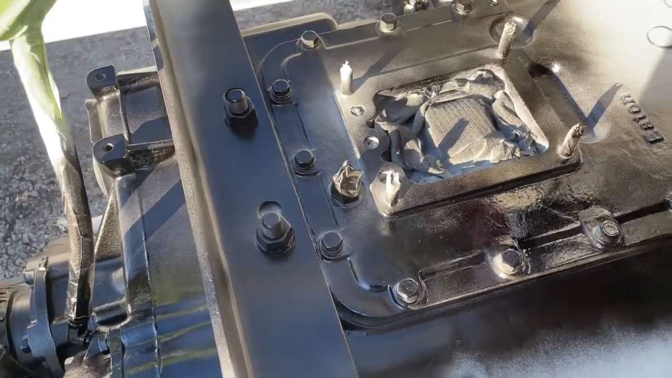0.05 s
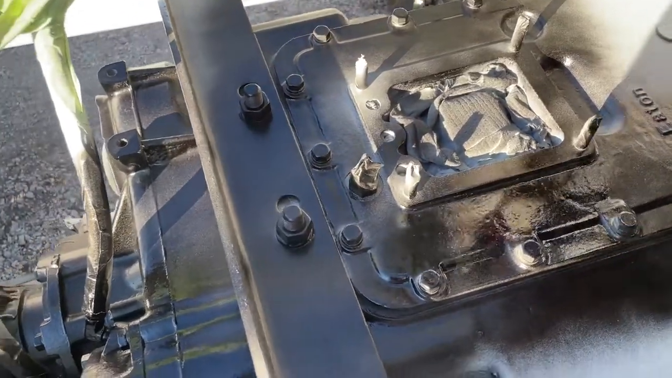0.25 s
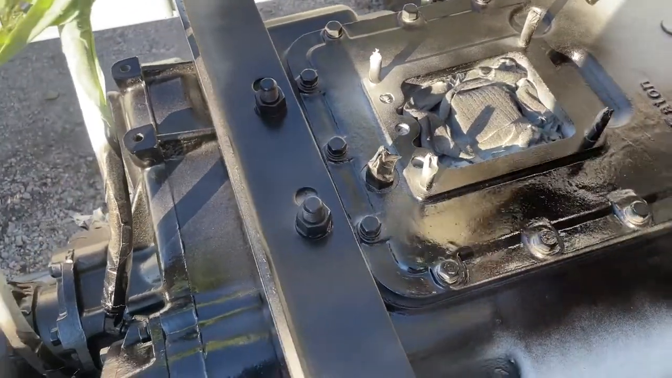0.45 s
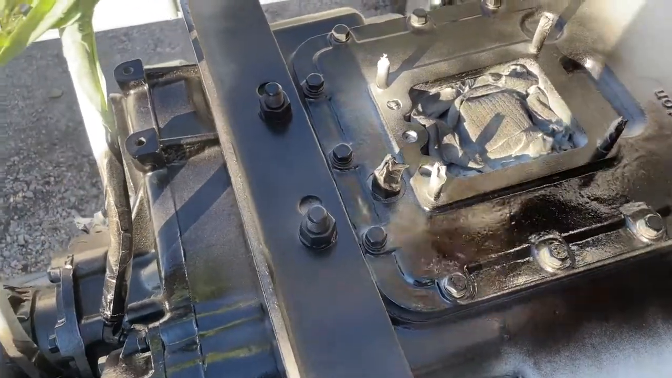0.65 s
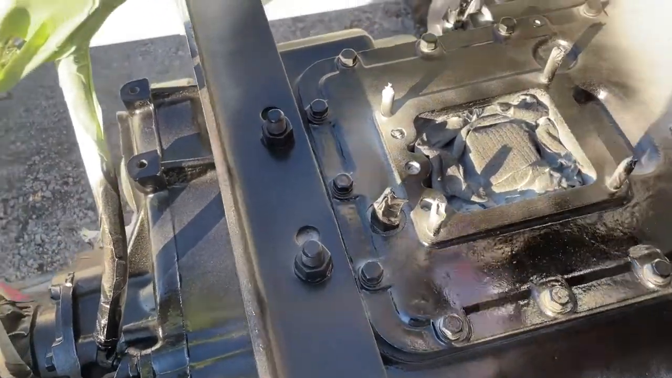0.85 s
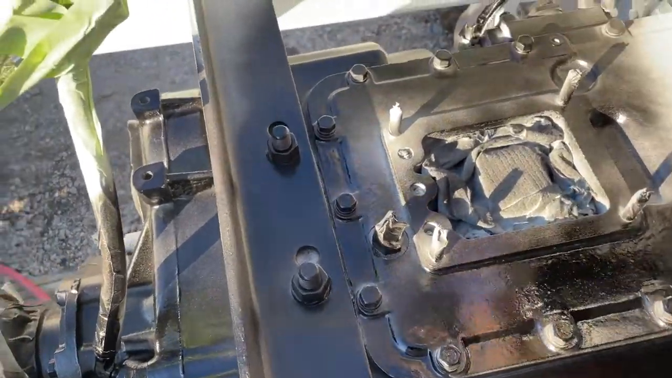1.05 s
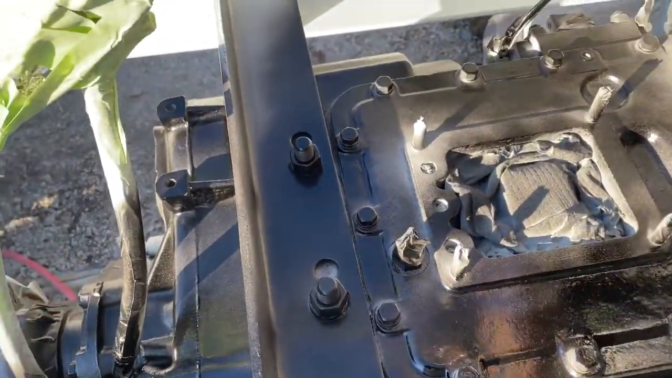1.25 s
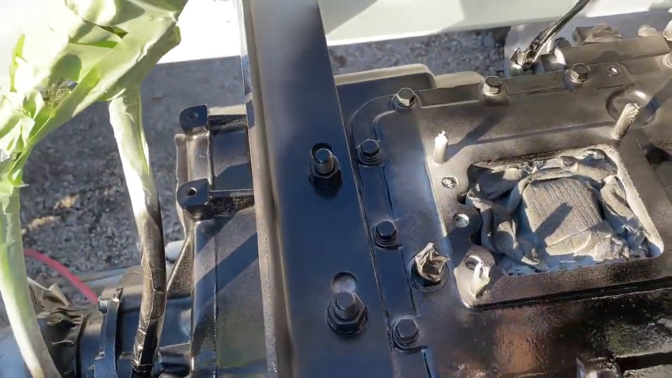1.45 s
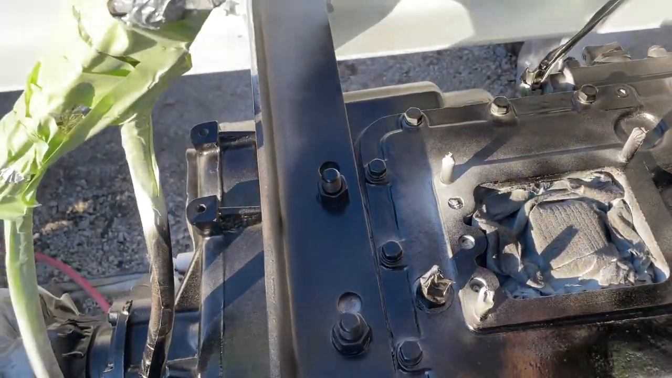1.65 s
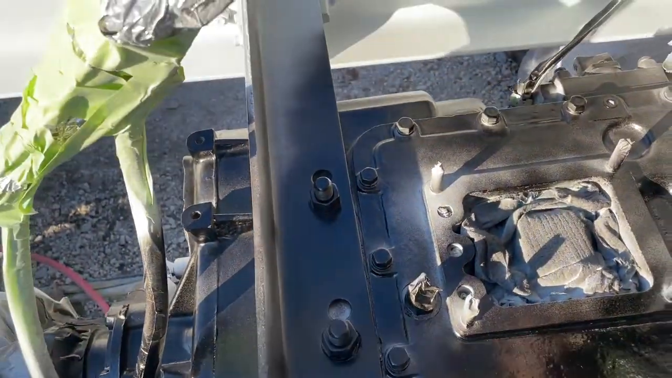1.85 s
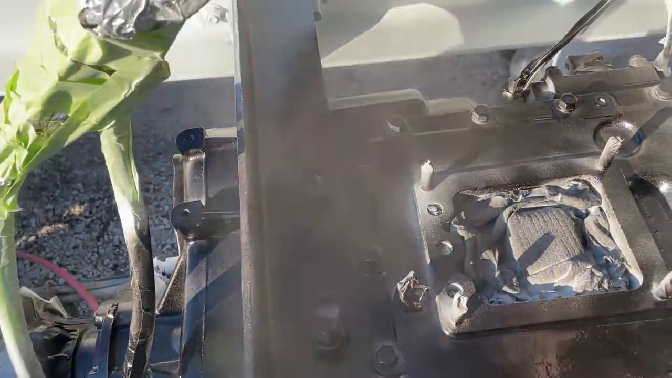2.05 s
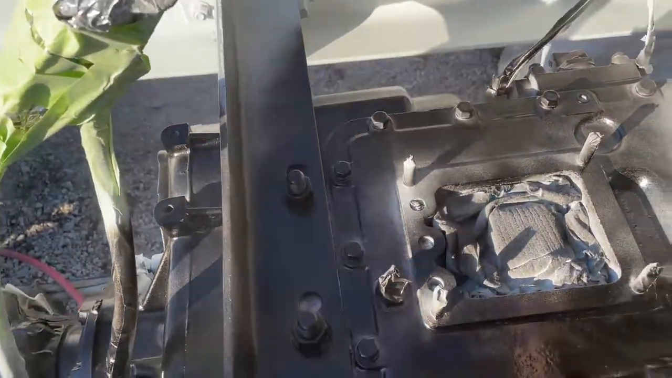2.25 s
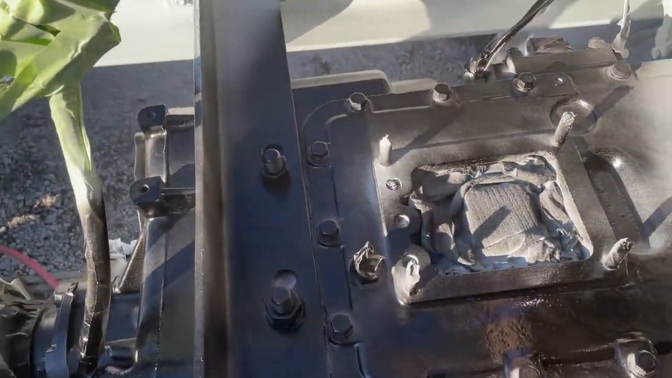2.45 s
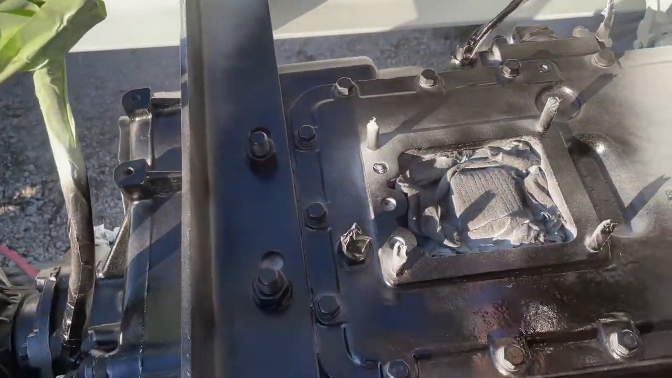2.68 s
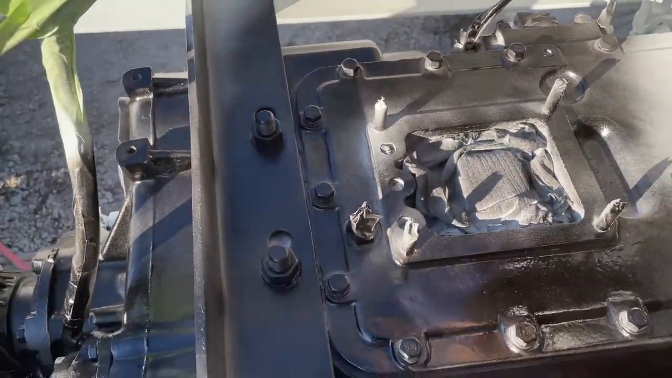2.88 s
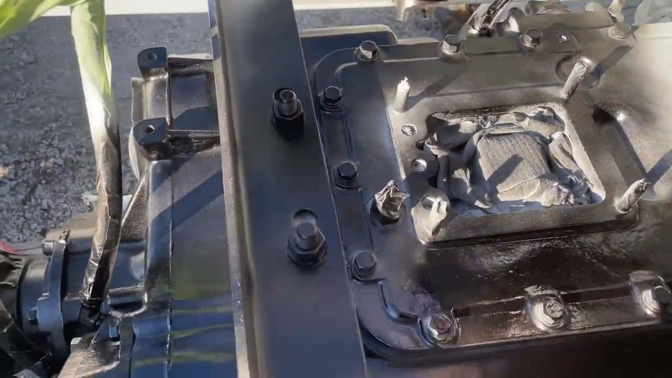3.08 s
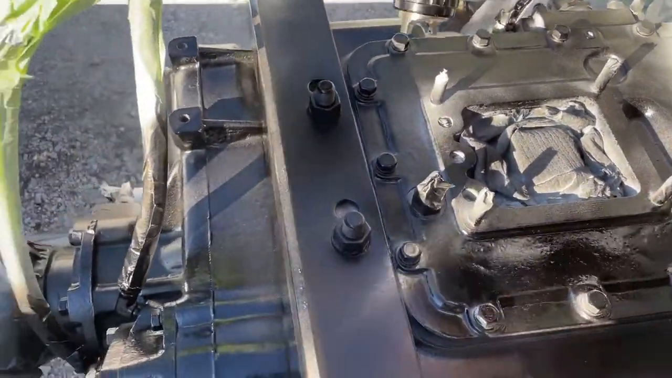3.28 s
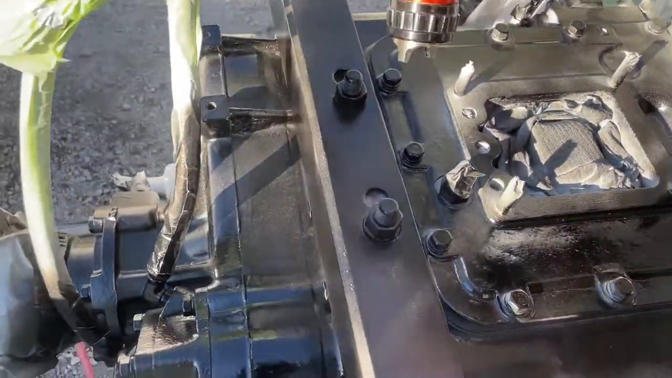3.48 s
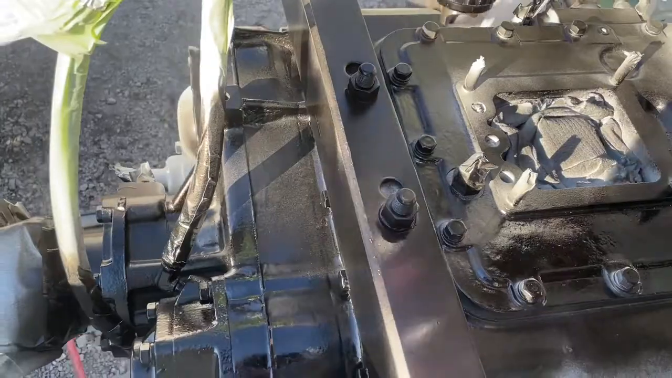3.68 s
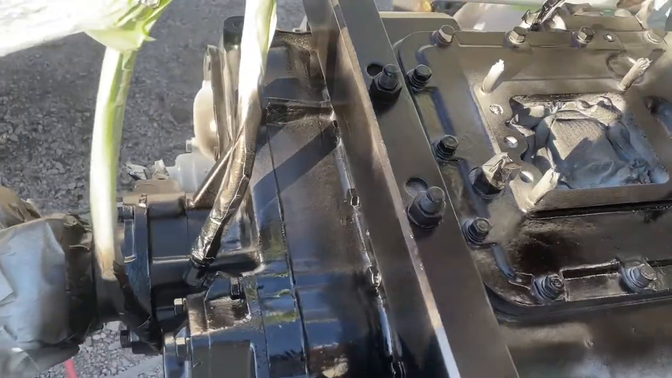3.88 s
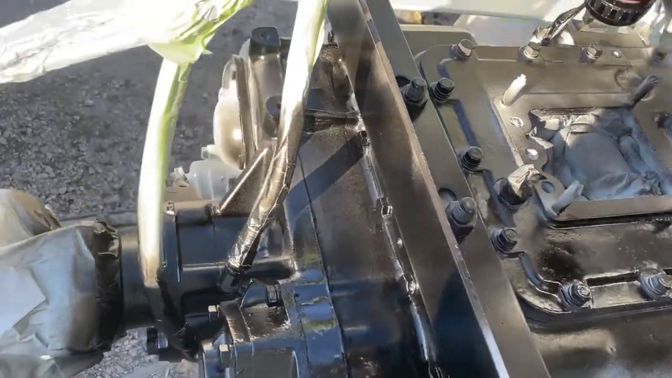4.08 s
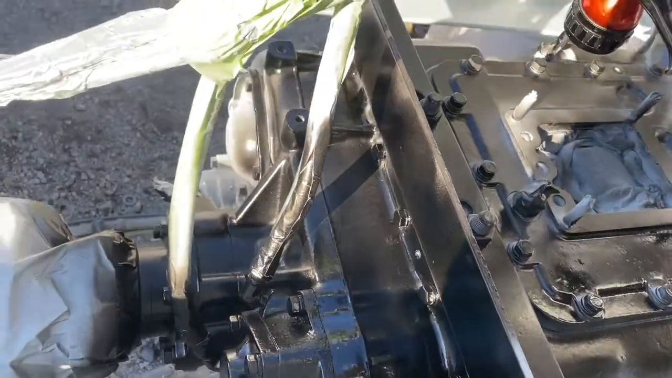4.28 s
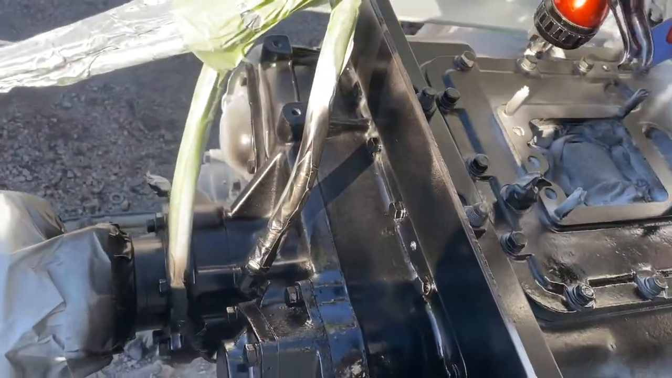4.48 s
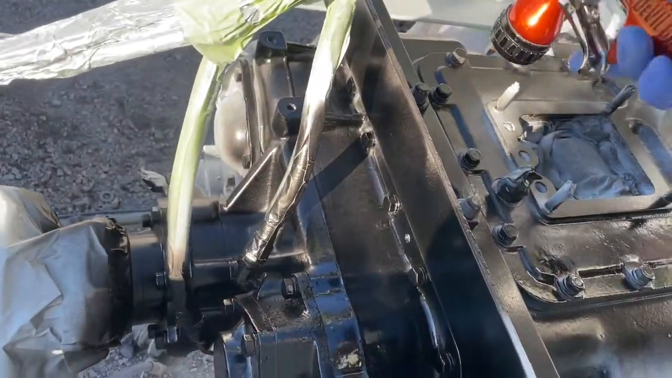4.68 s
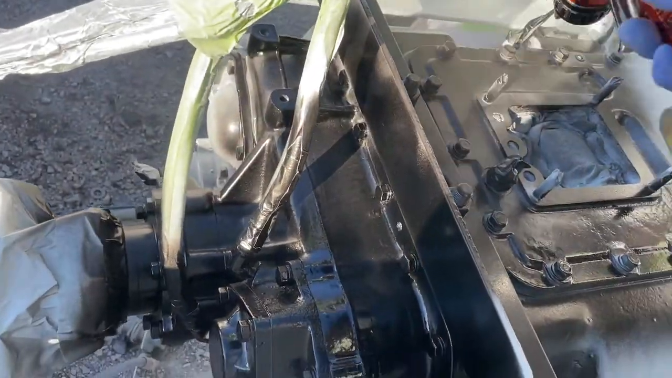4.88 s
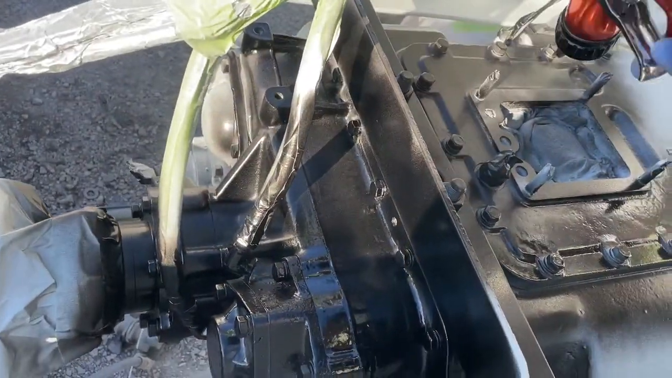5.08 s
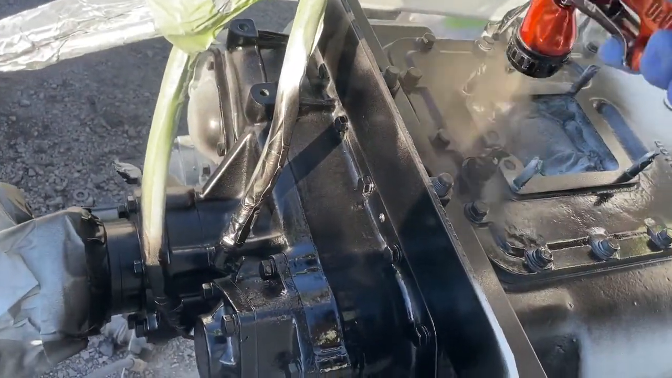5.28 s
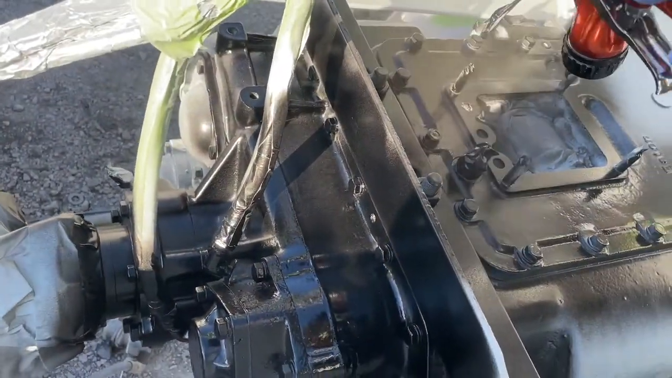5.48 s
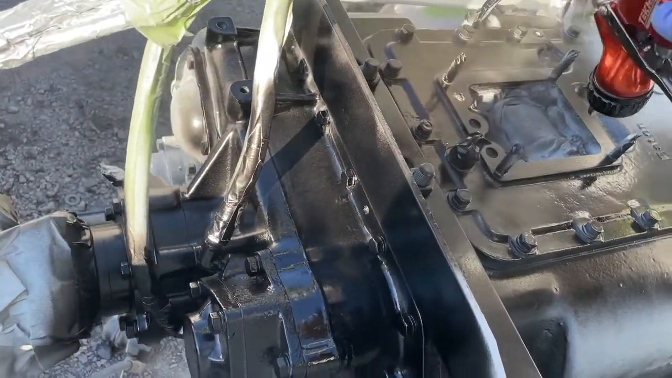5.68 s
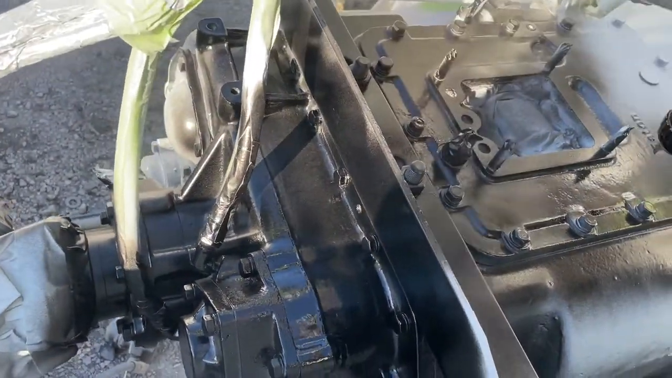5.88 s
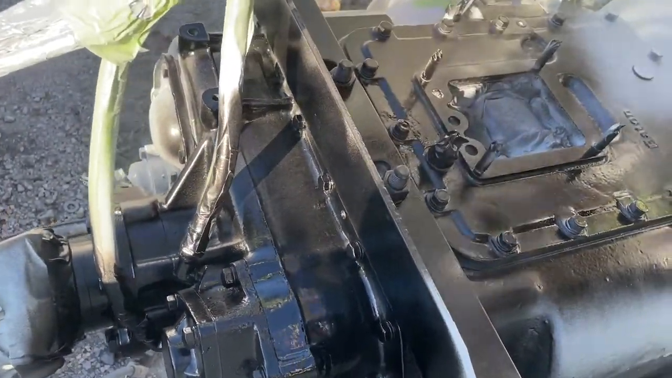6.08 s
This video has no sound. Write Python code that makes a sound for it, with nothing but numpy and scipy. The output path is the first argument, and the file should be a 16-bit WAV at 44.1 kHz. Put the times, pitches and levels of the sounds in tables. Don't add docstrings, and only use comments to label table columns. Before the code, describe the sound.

Close outdoor recording with a hand-held stereo microphone. A gritty little scrape and soft hand thumps come first, then a bright click. A trigger ticks and a quarter-second burst of paint spray hisses hard, with a hollow ring from the metal. Rustling and heavier low knocks follow, then two more short bursts close together, drier and slightly softer. Loose ticks and rumbles end it, over faint far traffic.

```python
import sys
import numpy as np
from scipy import signal
from scipy.fft import rfft, irfft, next_fast_len
from scipy.io import wavfile

SR = 44100
rng = np.random.default_rng(int(sys.argv[2]) if len(sys.argv) > 2 else 0)


def master(y):
    cut = np.clip(np.atleast_2d(y).T, -1, 1)
    pcm = np.round(cut * 32767)
    wavfile.write(sys.argv[1], SR, pcm.astype(np.int16))


def amplitude_ratio(level_db):
    exponent = np.asarray(level_db, float) / 20
    return 10 ** exponent


N = 270774
T = np.arange(N) / SR
SIZE = next_fast_len(N + 4096)
HZ = np.maximum(np.arange(SIZE // 2 + 1) * SR / SIZE, 1)

# (f/Hz, left over right/dB, likeness of near sound 0-1, likeness of sound all around 0-1)
PORTS = [(300, 0, 0.99, 0.3), (560, -3.5, 0.29, 0.037), (861, 0.5, 0.59, 0.13), (1100, 0.5, 1, 0.26),
         (1580, 4.5, 0.52, 0.29), (1940, -1.5, 0.41, 0.15), (2240, 1, 1, 0.67), (2700, 0.5, 0.51, 0.5),
         (3100, 3.5, 0.87, 0.41), (3500, 2.5, 0.25, 0.33), (3832, 3, 0.55, .27), (4120, -0.5, 0.27, .35),
         (4500, 1.5, 1, .45), (4884, 1.5, 0.91, 0.52), (5500, 0.1, .7, .5), (6100, 4.5, 0.77, 0.55),
         (6550, 0, .62, 0.71), (6915, -1.5, 0.87, 0.72), (7210, -2, 0.8, 0.93), (7510, 3, 0.98, 0.92),
         (8000, -1.1, .89, .85), (9000, 1.2, 0.67, .8), (10290, -0.7, 0.9, 0.8), (10500, -3, 1, 1),
         (11300, 1, 0.999, 0.94), (12080, -1, 0.56, 0.78), (12990, 0.5, .8, .8), (13500, 0, .72, .8),
         (13740, 2.5, .8, .85), (14000, 0, 0.93, 0.75), (15100, -1, 0.94, .9), (15500, -2, 0.75, 0.78)]
# (air opens t/s, held/s, level/dB, roar on the work/dB, roar is fullest at share of the pull)
PULLS = [
    (1.856, 0.262, -28, -41, 0.76),
    (4.677, 0.2058, -30.5, -41, 0.43),
    (5.227, .19, -29.5, -40, 0.33),
]
# (throatiness/dB, ring of a pocket in the casting/dB, f/Hz, jet enters the pocket after/s)
AIMS = [
    (-4, -36, 1450, .068),
    (0.5, -56.5, 1200, 0.0226),
    (-0.5, -42.5, 1290, 0.02),
]
SWELL_EDGE = 2.5


def rms_one(x):
    return x / np.sqrt(np.mean(x ** 2) + 1e-20)


def at_hz(points, hz, column=1):
    points = np.array(points)
    return np.interp(np.log(hz), np.log(points[:, 0]), points[:, column])


def drift(rate):
    r = np.exp(-80 * np.pi * rate / SR)
    steps = rng.standard_normal(N // 40 + 2002)
    slow = signal.lfilter([1], [1, -2 * r, r * r], steps)[2000:]
    return np.interp(np.arange(N) / 40, np.arange(len(slow)), rms_one(slow))


def swells(middle_s, half_s, level_db, edge, under_db):
    t = np.arange(0, N + 32, 32)[:, None] / SR
    bumps = np.exp(-np.abs((t - middle_s) / half_s) ** edge)
    power = np.sum(amplitude_ratio(2 * np.asarray(level_db)) * bumps, axis=1)
    return 10 * np.log10(np.interp(T, t[:, 0], power) + amplitude_ratio(2 * np.asarray(under_db)))


def resonate(x, hz, width_hz):
    r = np.exp(-np.pi * width_hz / SR)
    mode = [1, 0, -1, 1, -2 * r * np.cos(2 * np.pi * hz / SR), r * r]
    return signal.sosfilt([mode, mode], x)


def stereo_white(alike):
    mid, side = rfft(rng.standard_normal((2, SIZE)))
    alike = np.clip(alike, 0, 1)
    return np.sqrt(1 + alike) * mid + np.sqrt(1 - alike) * side * [[1], [-1]]


def hiss(spectrum, alike, curves, centres_hz, patchy_db, patch_rate):
    noise = stereo_white(alike) * amplitude_ratio(at_hz(spectrum[:-1], HZ)) * np.minimum(HZ / 250, 1) ** 2
    noise = noise / np.sqrt(np.mean(irfft(noise) ** 2))
    octave = np.maximum(np.log2(HZ), 8.25)
    out = 0
    for centre in np.arange(8.25, 14.5, .75):
        share = np.clip(1 - np.abs(octave - centre) / .75, 0, 1)
        weights = [np.interp(centre, np.log2(centres_hz), row) for row in np.eye(len(curves))]
        level_db = sum(w * c for w, c in zip(weights, curves)) + patchy_db * drift(patch_rate)
        out = out + amplitude_ratio(level_db) * irfft(noise * share, SIZE)[:, :N]
    return out


def spray():
    # (f/Hz, level/dB per Hz)
    jet = [(250, -14.5), (600, -14), (1000, -7), (1450, -6.5), (1950, -12), (2500, -7), (3250, -8),
           (4100, -9), (5000, -6.5), (6500, -2), (7100, -2.5), (8000, -1), (10000, -2.5), (11000, -1),
           (12500, -6.5), (14100, -9.5), (15300, -7), (16200, -54.5)]
    # (dB over the pull, opening/s, surge/dB, surge fades/s, closing squeeze/dB, release/dB per s)
    layers = [
        (2.5, 0.0083, 12, 0.017, -3, 1301),
        (17.5, 0.0046, 10.5, 0.012, -6, 1399.5),
        (5.5, 0.01, 13.5, 0.019, -2.5, 1595),
        (4.5, 0.0071, 19, 0.03, 7, 1800),
    ]
    # (level/dB, lasts/s, lingering of the surge as share)
    stored = [
        (1, 0.041, 0.93),
        (3.5, 0.04, 0.79),
        (3.5, .04, 0.94),
    ]
    squeezes = [0.88, 0.5, 0.75]
    eases = [0.75, 0.82, 1.1]
    grows = [4.5, -1.5, -0.5]
    valve_db, stored_drops_s = 24.5, .005
    squeeze_s, squeeze_lead_s = 0.021, 0.015
    hump_db, hump_share = 4.5, 0.36
    tail_db, tail_db_per_s = 41, 904
    sputter_most_db, sputter_fades_s = 1.6, .05

    levels = np.full((4, N), -110.)
    throat_db, sputter_db = np.zeros(N), np.zeros(N)
    for pull, aim, squeeze, ease, store, grows_db in zip(PULLS, AIMS, squeezes, eases, stored, grows):
        s, held, level_db, roar_db, fullest = pull
        stored_db, lasts, lingers = store
        u = T - s
        after = np.maximum(u - held, 0)
        aimed_db = aim[0] + grows_db * (np.clip(u / held, 0, 1) - .5)
        throat_db = np.where(u > -.1, aimed_db, throat_db)
        sputter_db += sputter_most_db * np.exp(-np.abs(u) / sputter_fades_s)
        closing = squeeze * np.exp(-((u - held + squeeze_lead_s) / squeeze_s) ** 2)
        hump = 1 - np.exp(-((u / held - fullest) / hump_share) ** 2)
        pressure_db = stored_db * .5 * (1 - np.tanh((u - lasts) / stored_drops_s))
        for k, (over_db, opening, surge_db, fades, squeeze_db, release) in enumerate(layers):
            shape = surge_db * np.exp(-np.maximum(u, 0) / (lingers * fades))
            shape = shape - valve_db * np.exp(np.minimum(-u / (ease * opening), 2))
            shape = shape + squeeze_db * closing
            shape = shape - np.minimum(release * after, tail_db + tail_db_per_s * after)
            if k < 2:
                shape = shape + roar_db - hump_db / (2 - k) * hump
            else:
                shape = shape + level_db + (k - 1) / 2 * pressure_db
            levels[k] = np.maximum(levels[k], over_db + shape)

    wash_db, roar_db, body_db, nozzle_db = levels
    curves = [wash_db + 12.5, roar_db, body_db + throat_db, body_db + .3, nozzle_db]
    near = at_hz(PORTS, HZ, column=2)
    air = hiss(jet, near, curves, [700, 1450, 2400, 4000, 8000], 0.92, 15)
    flutter_db = 0.65 * drift(60) + sputter_db * drift(300)
    return amplitude_ratio(flutter_db) * (air + singing(nozzle_db))


def singing(nozzle_db):
    # (number of the pull, f/Hz, width/Hz, level over the nozzle hiss/dB)
    hollows = [(0, 3250, 250, -27), (0, 6655, 700, -18), (0, 8430, 400, -17), (0, 10070, 400, -15),
               (0, 13010, 150, -16.5), (1, 2570, 400, -27.5), (1, 9030, 300, -24.5), (1, 11700, 600, -18.5),
               (1, 15540, 250, -17), (2, 2400, 400, -24.5), (2, 5830, 400, -23), (2, 6970, 500, -12),
               (2, 12130, 300, -19), (2, 14680, 150, -16)]
    out, noise = np.zeros((2, N)), irfft(stereo_white(1.0), SIZE)[:, :N]
    for pull, hz, width_hz, over_db in hollows:
        s, held = PULLS[round(pull)][:2]
        span = slice(round((s - .05) * SR), round((s + held + .1) * SR))
        out[:, span] += amplitude_ratio(nozzle_db[span] + over_db) * rms_one(resonate(noise[:, span], hz, width_hz))
    return out


def pocket():
    width_hz, fills_s, fades_db_per_s = 560, 0.0088, 25.5
    out = np.zeros((2, N))
    for (s, held, *_), (_, ring_db, hz, enters) in zip(PULLS, AIMS):
        u = np.arange(round((held + .05) * SR)) / SR
        common, left, right = rng.standard_normal((3, len(u)))
        ring = rms_one(resonate(common + 0.39 * np.array([left, right]), hz, width_hz))
        level_db = ring_db - fades_db_per_s * u - 1480 * np.maximum(u - held + 0.031, 0)
        filled = 1 / (1 + np.exp((enters - u) / fills_s))
        at = round(s * SR)
        out[:, at:at + len(u)] += ring * amplitude_ratio(level_db) * filled
    return out


def ticks():
    trigger_s = [1.828, 4.651]
    # (f/Hz, level/dB, t60/s)
    lever_modes = [
        (3250, -55.5, .05),
        (8240, -59, .05),
    ]
    strike = 4.5
    strike_width_hz = 2700
    t = np.arange(6144) / SR
    out, rows = np.zeros((2, N)), tick_rows()
    puffs = rng.standard_normal((len(rows), 3, len(t)))
    treble = signal.butter(2, [4500, 12500], "band", fs=SR, output="sos")
    for (s, body_db, hz, treble_db, t60, width), (common, left, right) in zip(rows, puffs):
        puff = (common + .4 * np.array([left, right])) * (1 - np.exp(-t / .0006))
        puff[:, 20] += strike
        puff[:, 20] += strike * np.sqrt(strike_width_hz / (width * hz))
        body = resonate(puff * amplitude_ratio(-60 * t / t60), hz, max(width, .02) * hz)
        crack = signal.sosfilt(treble, puff * amplitude_ratio(-60 * t / min(t60, .06)))
        at = round(s * SR)
        out[:, at:at + len(t)] += amplitude_ratio(body_db) * body / np.abs(body).max()
        out[:, at:at + len(t)] += amplitude_ratio(treble_db) * crack / np.abs(crack).max()
    lever = sum(amplitude_ratio(db - 60 * t / t60) * np.sin(2 * np.pi * hz * t) for hz, db, t60 in lever_modes)
    for s in trigger_s:
        at = round(s * SR)
        out[:, at:at + len(t)] += lever
    return out


def tick_rows():
    # (t/s, level/dB, f/Hz, t60/s)
    scrape = [(.150, -46, 596, 0.099), (.157, -49, 416, 0.033), (.163, -43, 390, 0.034),
              (.172, -38, 800, 0.018), (.175, -46, 493, 0.03), (.179, -40, 560, 0.061),
              (.187, -45, 586, 0.04), (.193, -44, 610, 0.05), (.200, -44, 348, 0.042),
              (.221, -40, 456, 0.041), (.227, -45, 377, 0.048), (.253, -51, 800, 0.03),
              (.282, -51, 970, 0.12)]
    # (t/s, level/dB,
    # f/Hz, t60/s)
    taps = [(.174, -48, 1640, .03), (.183, -42, 1590, 0.046), (.226, -47, 1340, 0.058),
            (.124, -51.5, 5030, .03), (.32, -63, 1440, .069), (.647, -49, 2130, 0.031),
            (1.287, -45, 850, 0.079), (1.83, -40, 685, 0.02), (1.842, -47, 5900, 0.12),
            (.283, -64, 1620, .08), (.335, -55, 900, .04), (4.965, -49, 2500, 0.054),
            (4.975, -48.5, 1300, 0.049), (5.088, -48, 1200, 0.033), (5.49, -42, 3100, .04),
            (5.505, -45, 2050, .05), (5.51, -60, 3200, .04), (1.276, -46, 3100, 0.045),
            (1.284, -39, 4360, .03), (1.284, -48, 1930, 0.046), (1.297, -56, 484, .05),
            (1.42, -60, 2500, .03), (1.42, -53, 5500, .03), (1.696, -59, 2700, 0.044),
            (1.757, -56, 4500, .04), (2.96, -53.5, 500, 0.041), (2.961, -55, 1520, .03),
            (3.207, -68, 1400, 0.036), (3.521, -55, 2940, .05), (5.481, -44, 2330, .06),
            (5.873, -60.5, 450, 0.037), (2.593, -47, 1303, 0.055), (3.097, -48.5, 1180, 0.03),
            (3.432, -35.5, 1300, 0.12), (3.547, -50, 1550, 0.036), (3.754, -47.5, 1450, 0.07),
            (4.091, -44.5, 1100, 0.074), (4.335, -51, 1770, 0.04), (4.424, -52, 1220, 0.1),
            (4.463, -45, 1064, 0.077), (4.907, -41, 1540, 0.06), (4.907, -48, 794, 0.033),
            (5.053, -47.5, 1170, 0.078), (5.527, -42.5, 2700, 0.039), (5.536, -43, 2820, 0.018),
            (5.538, -45, 1240, 0.032), (5.768, -52, 556, 0.039), (5.5, -49, 1420, 0.097),
            (4.653, -45.5, 514, 0.042)]
    # (t/s, level/dB, f/Hz, t60/s)
    pings = [(.281, -59, 1995, 0.25), (5.776, -56, 1850, 0.067), (0.148, -54.5, 310, .25),
             (.165, -55, 490, 0.13), (0.17, -54.5, 590, .2), (.176, -59, 1610, .12), (.283, -66, 1620, .15),
             (0.35, -64, 1490, 0.11), (1.5, -56, 750, .1), (1.14, -62, 660, .12)]
    # (t/s, level/dB, f/Hz, t60/s)
    more_taps = [(3.475, -45, 1450, 0.056), (4.4, -48, 1420, .05), (3.1, -48, 1520, 0.053),
                 (3.2, -50, 1500, .04), (5.3, -55, 1600, .04), (4.256, -57, 1700, 0.066),
                 (4.258, -54, 1000, 0.055), (4.981, -47, 2300, .03), (1.829, -50, 1700, .03),
                 (1.284, -45.5, 2600, 0.064), (1.8, -50.5, 850, 0.065), (4.653, -51, 3000, .04),
                 (5.47, -54, 980, 0.066), (3.5, -48, 440, 0.046), (3.493, -45.5, 420, .04),
                 (4.312, -53, 220, .05)]
    # (t/s, body/dB, treble/dB, t60/s)
    snaps = [(0.037, -45.5, -62, 0.07), (1.276, -58, -52, .045), (1.284, -36, -28, 0.033),
             (1.827, -38, -41, 0.039), (2.386, -57.5, -52.5, 0.044), (2.509, -54.5, -62, 0.049),
             (2.746, -54, -65.5, 0.041), (2.961, -46, -43, 0.067), (3.435, -35.5, -66, 0.06),
             (3.445, -50, -47, 0.048), (3.488, -39, -56, 0.025), (4.524, -53, -53, .043),
             (4.652, -33.5, -35.5, 0.046), (4.988, -48, -63, 0.031), (5.099, -47, -44, 0.024),
             (5.116, -60, -46, 0.034), (5.129, -70.5, -42, 0.019), (3.031, -50, -44, .04),
             (3.099, -52, -53, .03), (4.952, -74.5, -57, .04), (5.633, -44.5, -51, 0.041),
             (5.829, -53, -59, 0.025)]
    kinds = [(scrape, -8, 0.95), (taps, -9, 0.34), (pings, -9, 0.033), (more_taps, -9, 0.34)]
    rows = []
    for table, treble_db, width in kinds:
        rows += [(s, db, hz, db + treble_db, t60, width) for s, db, hz, t60 in table]
    return rows + [(s, db, 2690, treble_db, t60, 1.5) for s, db, treble_db, t60 in snaps]


def grip():
    # (t/s, level/dB)
    pressure = [(0, -62), (.55, -57), (.9, -54.5), (1.12, -70), (1.3, -56), (1.7, -56), (2.2, -63),
                (2.6, -67), (3.0, -57.5), (3.38, -49), (3.5, -46.5), (3.85, -46.5), (4.05, -67),
                (4.45, -45.5), (4.7, -64.5), (5.0, -58.5), (5.8, -65.5), (6.14, -53.5)]
    # (t/s, deep rumble/dB, knocking/dB)
    shifts = [(.19, -60, -57), (.29, -71, -64), (0.682, -43, -59), (.765, -52, -70), (.86, -52, -62),
              (5.62, -64, -58), (1.57, -55, -58), (1.889, -49.5, -41), (1.95, -49, -55), (2.111, -56, -49),
              (2.36, -45.5, -68.5), (2.911, -77, -83), (3.299, -48.5, -54), (3.44, -50, -45),
              (3.514, -43, -45), (3.61, -44, -50), (3.679, -47.5, -60), (3.75, -50, -55),
              (3.82, -43, -48.5), (3.92, -47.5, -76.5), (4.125, -48, -68), (4.21, -46, -57),
              (4.381, -45, -62), (4.48, -57.5, -50), (4.62, -52.5, -72), (4.7, -51, -52),
              (4.871, -49.5, -50), (5.239, -46.5, -49.5), (5.421, -49, -44.5), (6.03, -46.5, -73)]
    # (t/s, peak level/dB, f/Hz, t60/s)
    knocks = [(0.592, -44, 137, 0.053), (0.664, -42, 100, 0.076), (0.671, -39.5, 195, 0.053),
              (0.697, -39, 128, 0.091), (0.756, -39.5, 110, 0.087), (0.771, -42.5, 199, 0.051),
              (0.833, -36.5, 198, 0.03), (0.844, -31.5, 180, 0.022), (2.368, -32, 90.4, 0.084),
              (2.893, -43.5, 70, 0.19), (3.402, -36.5, 132, 0.098), (3.42, -22.5, 110, 0.066),
              (3.427, -21, 243, 0.018), (3.446, -28, 95, 0.067), (3.464, -30.5, 120, 0.091),
              (3.849, -44.5, 89, 0.13), (3.91, -42, 94, 0.12), (0.282, -49, 110, 0.12),
              (0.52, -47, 108, 0.13), (3.478, -32, 120, 0.064), (3.488, -33.5, 300, 0.041),
              (3.497, -29, 99, 0.065), (3.521, -46, 110, 0.066), (3.581, -41, 99, .07),
              (3.611, -32, 75, .08), (3.65, -30, 95, 0.048), (3.76, -38, 91, 0.079),
              (3.598, -36.5, 197, 0.044), (3.628, -35, 144, 0.14), (3.671, -44, 160, 0.047),
              (3.735, -36.5, 148, 0.087), (3.788, -35, 152, 0.049), (3.804, -38.5, 258, 0.035),
              (4.095, -36.5, 224, 0.041), (4.098, -33, 90.5, 0.098), (4.174, -41, 171, 0.037),
              (4.186, -39, 268, 0.036), (4.208, -36, 82, 0.1), (4.36, -45, 84.4, 0.057),
              (4.376, -37.5, 180.3, 0.08), (4.397, -36, 103, 0.043), (4.436, -36.5, 90, .08),
              (4.485, -45, 195, 0.047), (4.493, -35, 89.5, 0.082), (5.422, -41, 110, 0.061),
              (6.007, -37.5, 92.5, 0.04), (.127, -48, 109, 0.041), (5.625, -48, 101.6, 0.12),
              (5.7, -51, 100, .06), (5.935, -48.5, 120, .09)]
    shift_s, shift_edge = 0.038, 2
    knocking_db, buffet_db = -10.5, -22
    knock_rise_s, knock_pan_db = 0.001, 3

    steady_db = np.interp(T, *np.transpose(pressure))
    at_s, deep_db, knock_db = np.transpose(shifts)
    s, held, level_db, *_ = np.transpose(PULLS)
    buffeted_db = swells(s + held / 2, held / 2, level_db + buffet_db, 4.7, steady_db + knocking_db)
    deep_level_db = swells(at_s, shift_s, deep_db, shift_edge, steady_db)
    knocking_level_db = swells(at_s, 0.49 * shift_s, knock_db, shift_edge, buffeted_db)
    # (level/dB, low edge/Hz, high edge/Hz, lumpiness/dB, lump rate/Hz)
    bands = [(deep_level_db, 46.8, 122, 0.91, 29), (knocking_level_db, 135, 284, 3.5, 40)]
    out = np.zeros((2, N))
    for level_db, low_hz, high_hz, lumpy_db, rate in bands:
        band = signal.butter(2, [low_hz, high_hz], "band", fs=SR, output="sos")
        noise = signal.sosfilt(band, irfft(stereo_white(.8), SIZE))[:, -N:]
        out += amplitude_ratio(level_db - 3.5) * rms_one(noise * amplitude_ratio(lumpy_db * drift(rate)))

    t = np.arange(8192) / SR
    for s, peak_db, hz, t60 in knocks:
        knock = amplitude_ratio(peak_db - 60 * t / t60) * (1 - np.exp(-t / knock_rise_s)) * np.sin(2 * np.pi * hz * t)
        sides = amplitude_ratio(knock_pan_db * rng.standard_normal() * np.array([[1], [-1]]))
        at = round(s * SR)
        out[:, at:at + len(t)] += knock[:N - at] * sides
    return out


def rustle():
    # (f/Hz, level/dB per Hz)
    air = [(400, -6.5), (600, -7.5), (1000, -9), (1450, -11), (1950, -14.5), (2500, -11), (3800, -11),
           (5000, -11.5), (6500, -10.5), (8000, -7.5), (10000, -8), (12500, -10), (14000, -17),
           (15300, -18.5), (16200, -60)]
    # (middle t/s, half length/s, level/dB, coarseness/dB)
    strokes = [(0.01, 0.028, -72.5, 6.5), (0.225, 0.13, -71, 5.5), (0.532, 0.15, -69.5, 2.5),
               (0.667, 0.041, -65.5, 5), (0.878, 0.16, -67, 2), (1.217, 0.1, -73, 6), (1.39, 0.085, -76, 8),
               (1.82, 0.091, -79, 9), (2.196, 0.038, -76, -25), (2.38, 0.07, -81.5, 10),
               (2.59, 0.035, -85, 7), (2.835, 0.13, -77, 4), (3.077, 0.048, -65, 8),
               (3.218, 0.063, -61.5, 4.5), (3.363, 0.04, -70.5, 4), (3.456, 0.022, -65.5, 11.5),
               (3.557, 0.045, -64.5, 11), (3.666, 0.037, -61, 2), (3.828, 0.12, -62, 2.5),
               (4.035, 0.091, -69, 3), (4.218, 0.075, -66.5, 5), (4.4, 0.096, -71, 3), (4.59, 0.12, -73, 6),
               (4.965, 0.035, -74.5, 19), (5.082, 0.074, -75.5, 17), (5.5, 0.045, -69.5, 14),
               (5.628, 0.055, -69, 4.5), (5.759, 0.066, -76.5, 8.5), (5.966, 0.086, -74, 0),
               (6.127, 0.065, -68.5, 2.5)]
    # (middle t/s, half length/s, level/dB)
    traffic = [
        (.2, 0.19, -54),
        (1.5, 0.33, -51),
        (2.7, 0.38, -60.5),
        (3.452, 0.26, -51.5),
        (4.4, 0.28, -56.5),
        (5.499, 0.37, -51),
    ]
    floor = [-74, -72.5, -82.5]
    stroke_edge, low_share, low_over_db = 2.8, 0.61, -1

    s, half, level_db, rough_db = np.transpose(strokes)
    low_db = swells(s, half, level_db + low_over_db + low_share * rough_db, stroke_edge, floor[0])
    coarse_db = swells(s, half, level_db + rough_db, stroke_edge, floor[1])
    fine_db = swells(s, half, level_db, stroke_edge, floor[2])
    murmur_db = swells(*np.transpose(traffic), SWELL_EDGE, -61.5 + 0.14 * (low_db + 74.0))
    bass_db = -56.5 + 0.27 * (murmur_db + 64.0)
    top_db = -70.0 + 1.4 * (fine_db + 69.0)
    curves = [bass_db, murmur_db, low_db + 14.0, coarse_db + 5.0, fine_db + 8.0, top_db]
    diffuse = at_hz(PORTS, HZ, column=3)
    centres_hz = [300, 800, 1400, 2600, 8000, 16000]
    return amplitude_ratio(2.0 * drift(35)) * hiss(air, diffuse, curves, centres_hz, 1.4, 10.0)


def tyres():
    # (middle t/s, half length/s, level/dB)
    passes = [
        (1.2, 0.24, -70),
        (1.55, 0.57, -66),
        (3.548, 0.32, -63),
    ]
    band = signal.butter(2, [500, 850], "band", fs=SR, output="sos")
    noise = rms_one(signal.sosfilt(band, rng.standard_normal((2, N))))
    level_db = swells(*np.transpose(passes), SWELL_EDGE, -110)
    return amplitude_ratio(level_db + 0.6 * drift(8)) * noise


def scene():
    return spray() + pocket() + ticks() + grip() + rustle() + tyres()


def band_limit(x):
    return signal.sosfilt(signal.butter(12, 17140, fs=SR, output="sos"), x)


def record(dry):
    # (f/Hz, lead/half turns)
    phase_lead = [(600, 0), (1200, -.14), (1720, -.38), (2080, 0), (5450, 0), (6100, -.3), (6800, -.96),
                  (6950, -1), (7700, -1), (9300, -1.52), (10550, -2), (11450, -2), (13400, -2.72),
                  (13750, -2.85), (13950, -3), (15150, -3), (15500, -3.17)]
    lead = np.pi * np.interp(HZ, *np.transpose(phase_lead))
    half = amplitude_ratio(.5 * at_hz(PORTS, HZ)) * np.exp(.5j * lead)
    cavity = amplitude_ratio(3 * np.exp(-((HZ - 1610) / 200) ** 2))
    ported = irfft(rfft(dry, SIZE) * cavity * [half, 1 / half], SIZE)[:, :N]
    top_cut = signal.cheby2(22, 70, 16130, fs=SR, output="sos")
    mix = signal.sosfilt(top_cut, ported)
    return band_limit(mix)


dry = scene()
out = record(dry)
master(out)
```